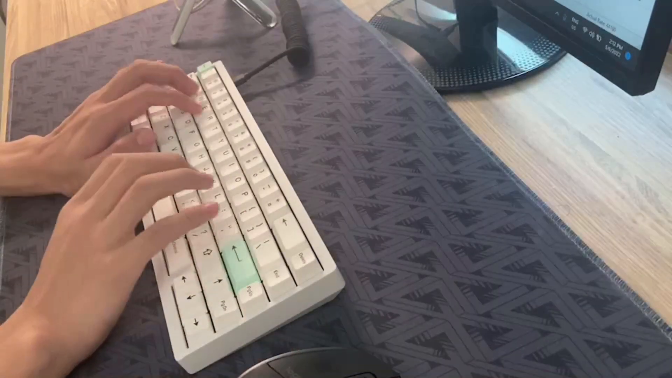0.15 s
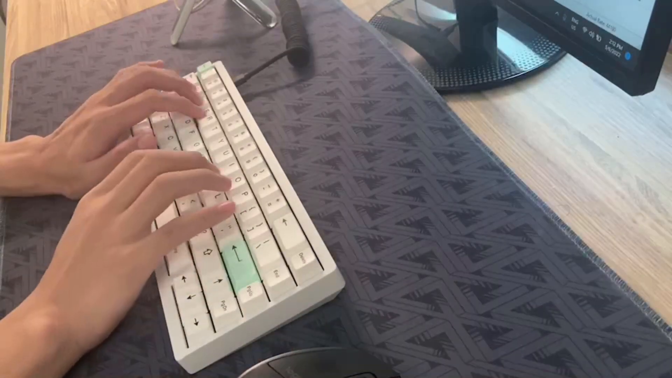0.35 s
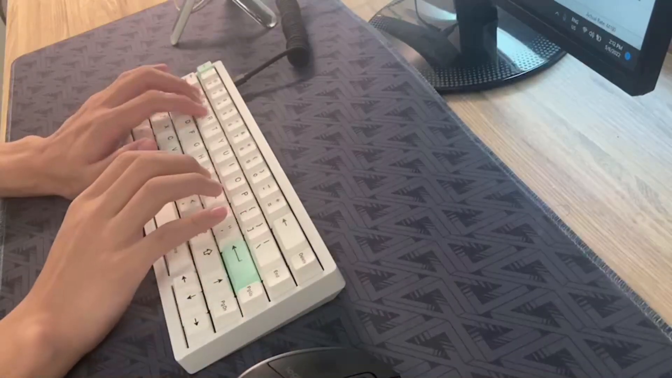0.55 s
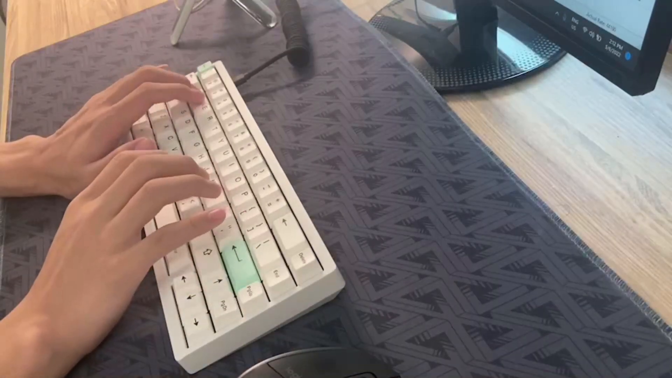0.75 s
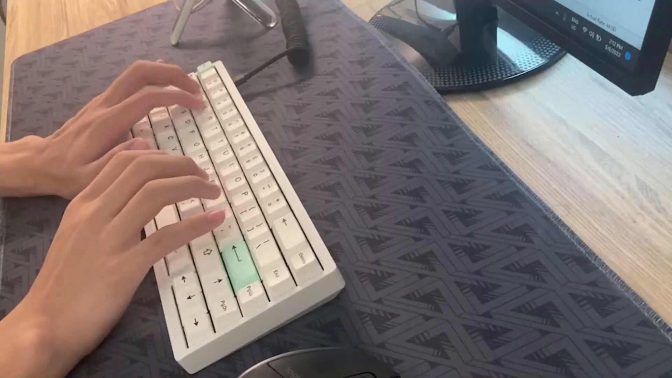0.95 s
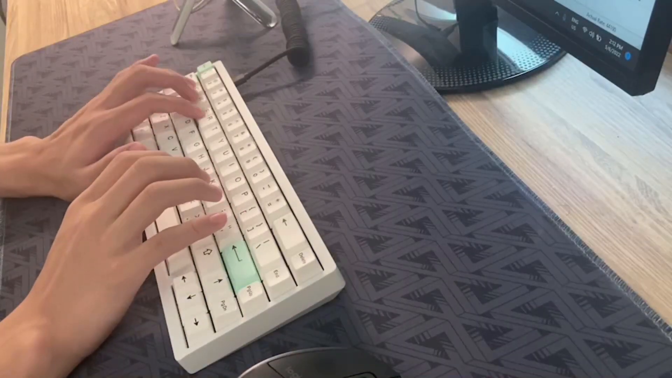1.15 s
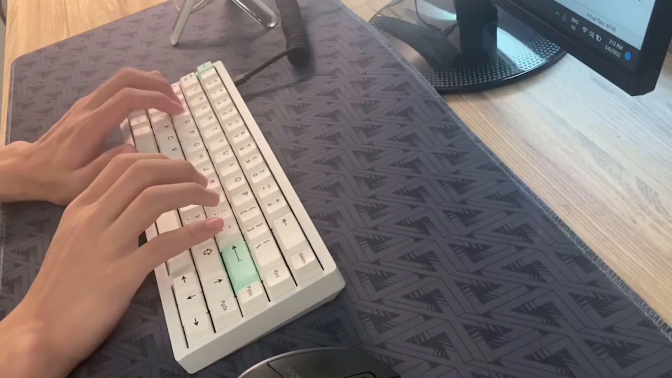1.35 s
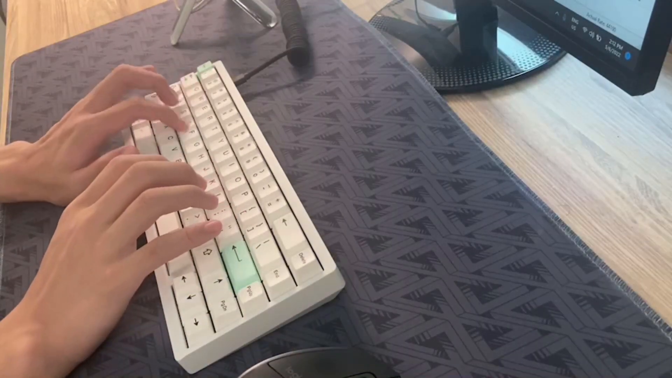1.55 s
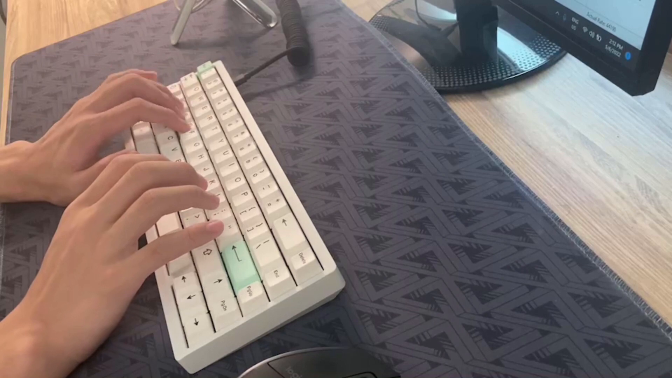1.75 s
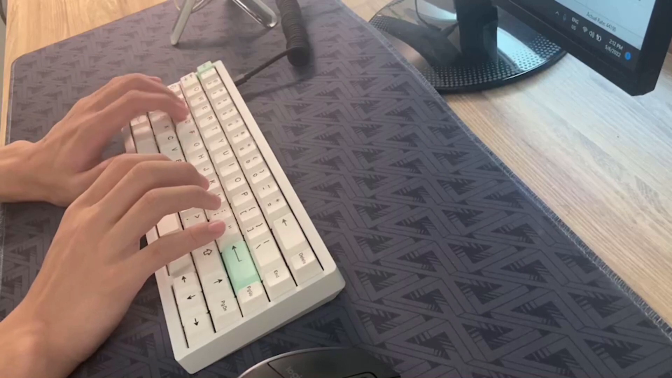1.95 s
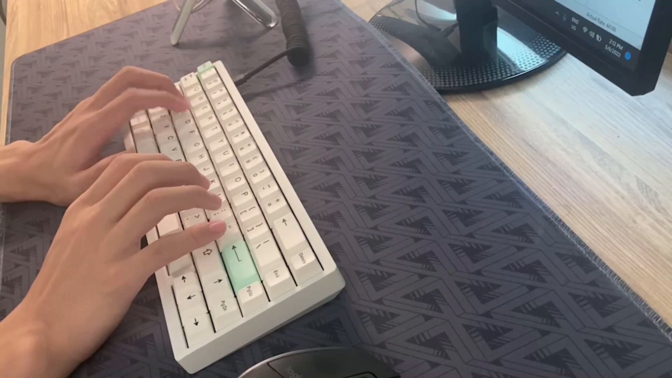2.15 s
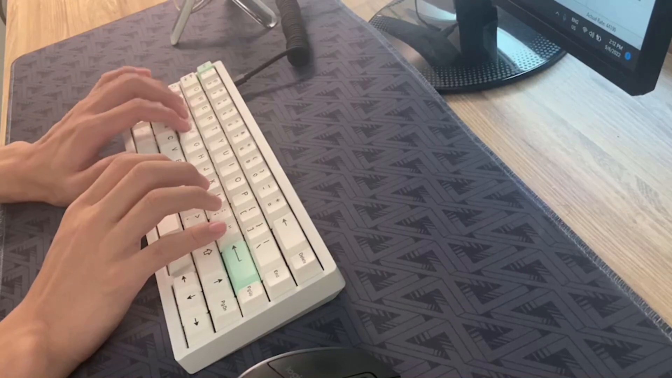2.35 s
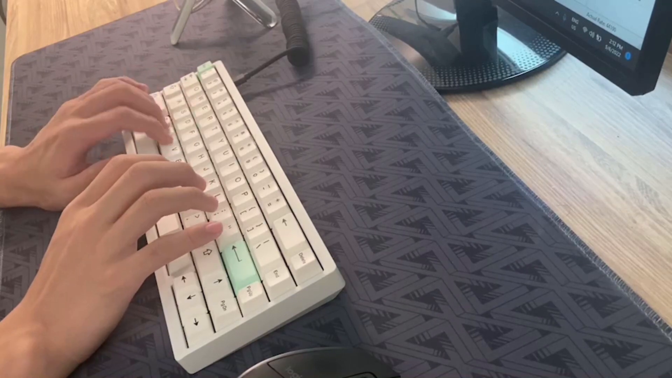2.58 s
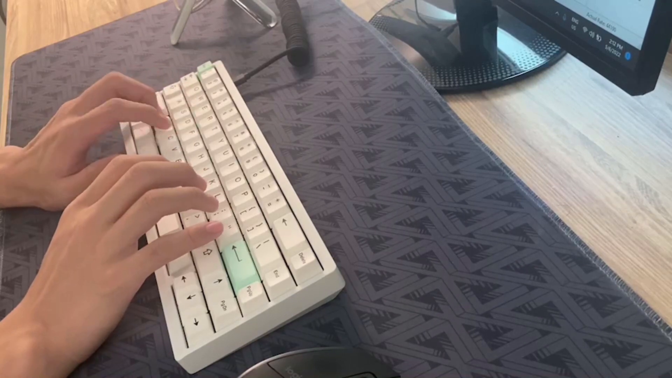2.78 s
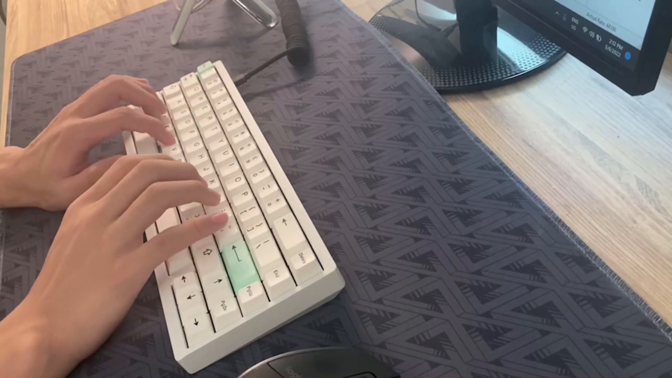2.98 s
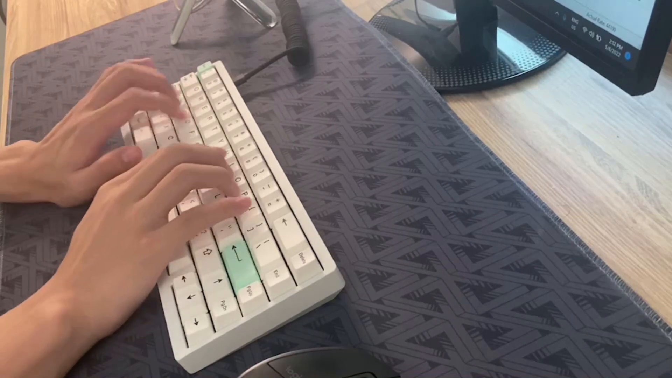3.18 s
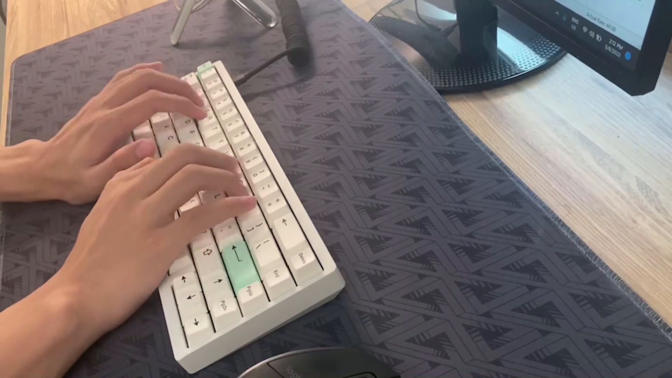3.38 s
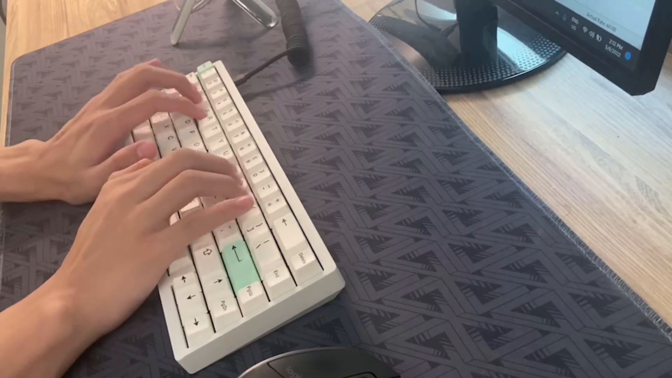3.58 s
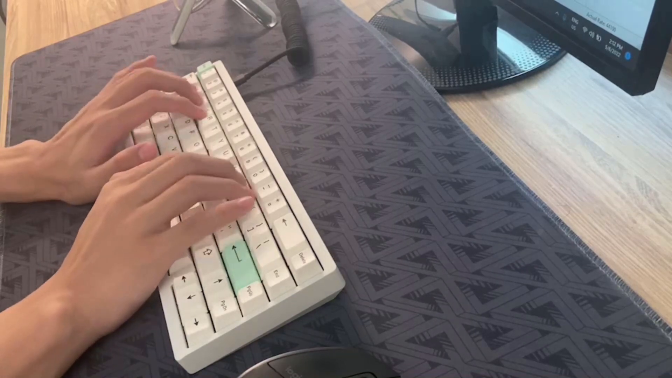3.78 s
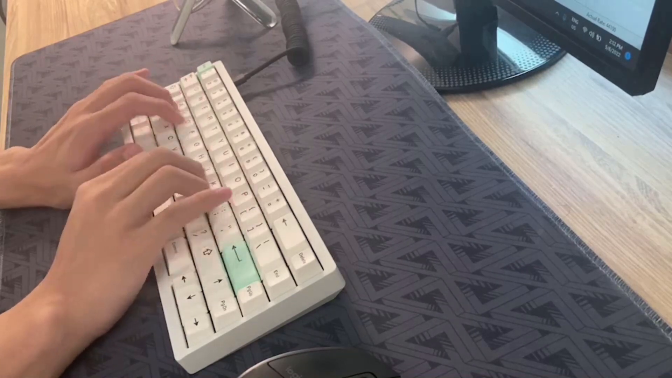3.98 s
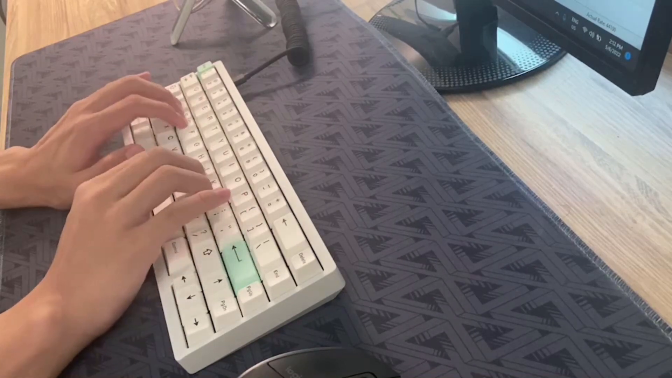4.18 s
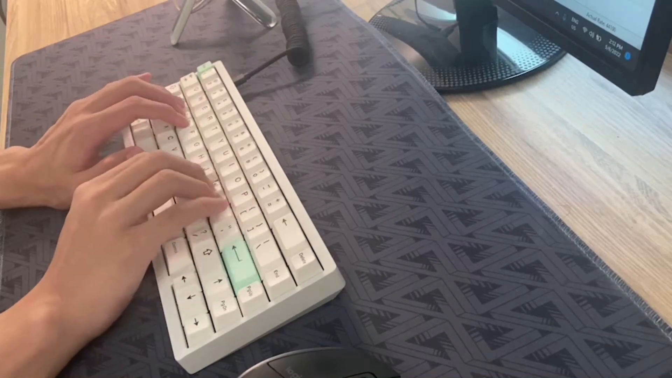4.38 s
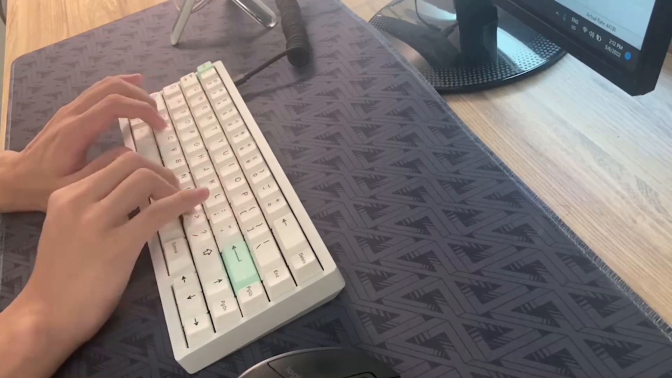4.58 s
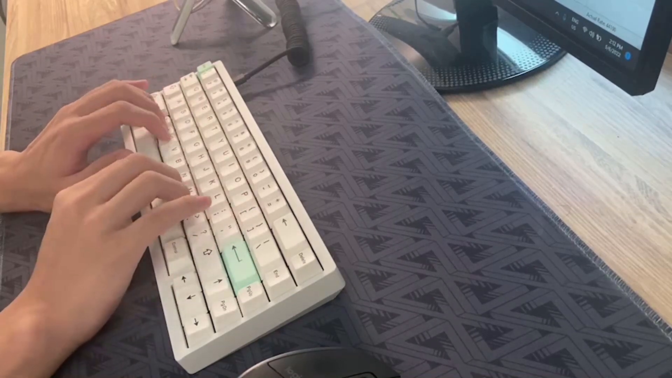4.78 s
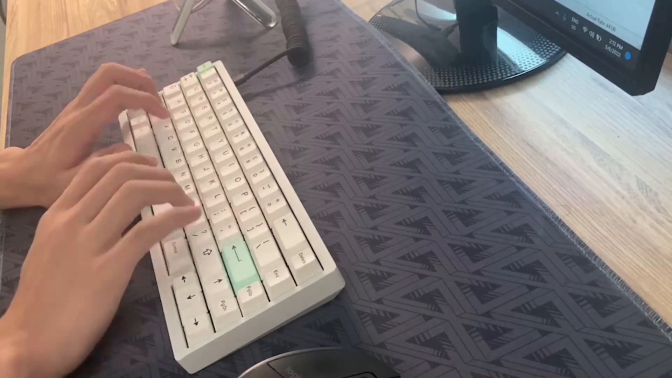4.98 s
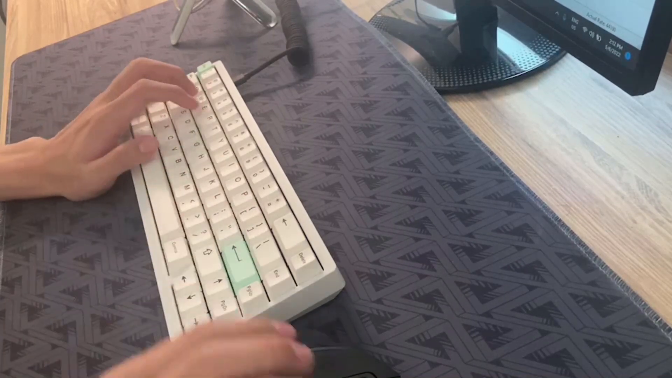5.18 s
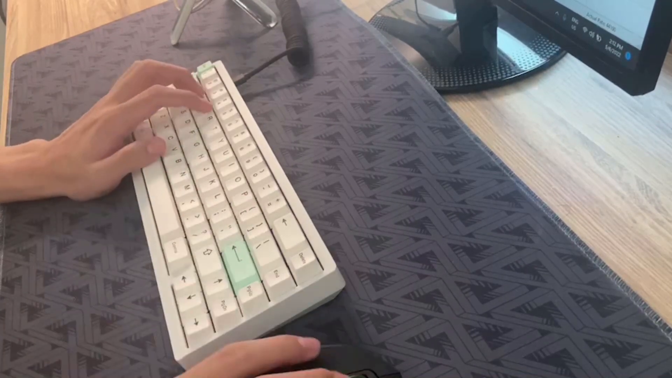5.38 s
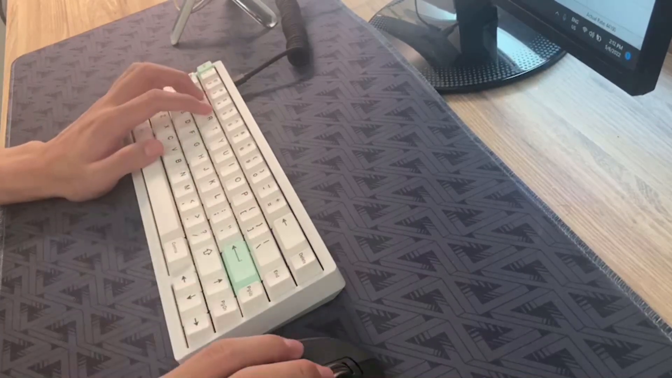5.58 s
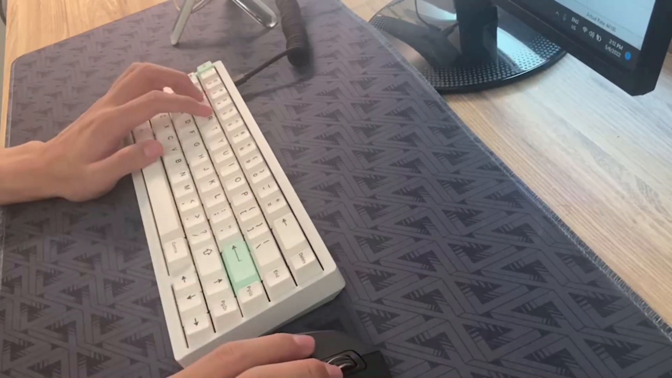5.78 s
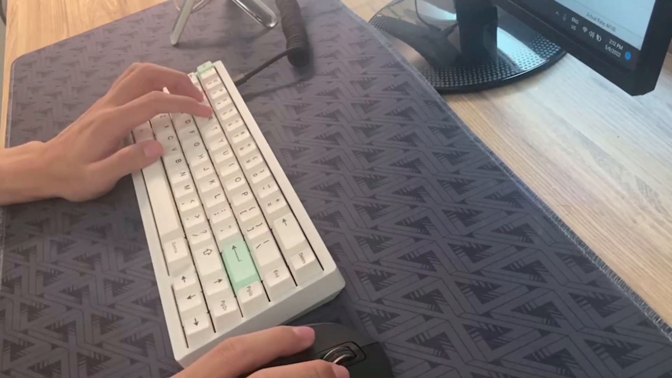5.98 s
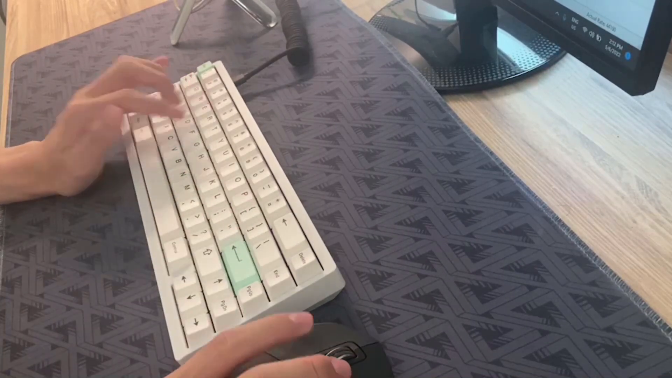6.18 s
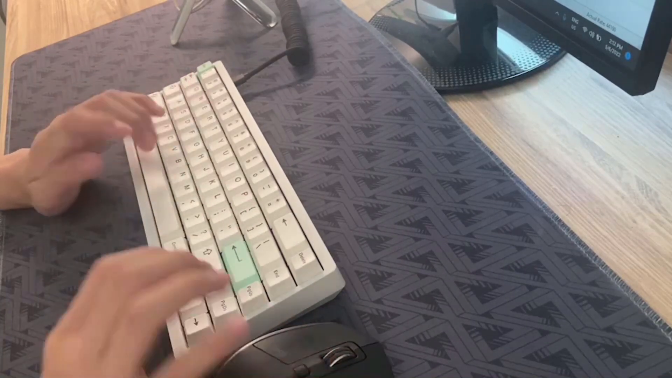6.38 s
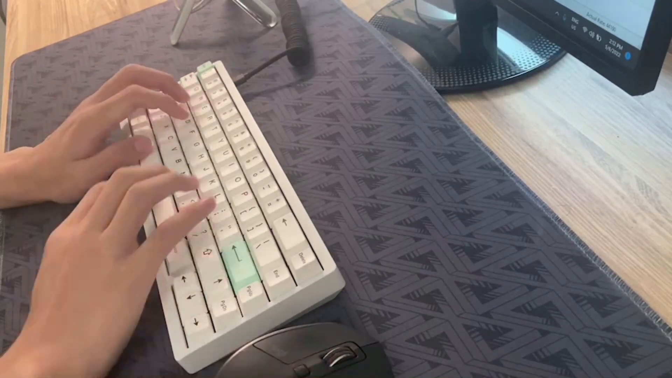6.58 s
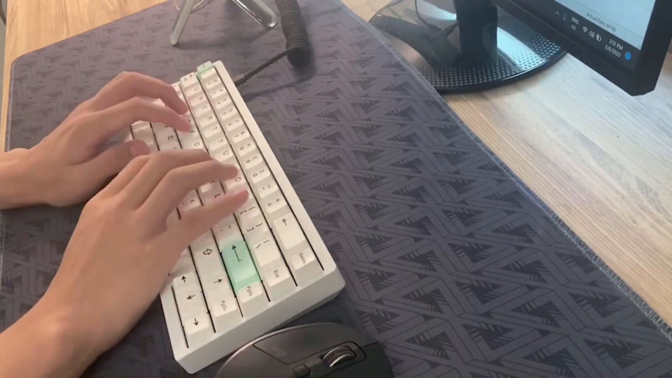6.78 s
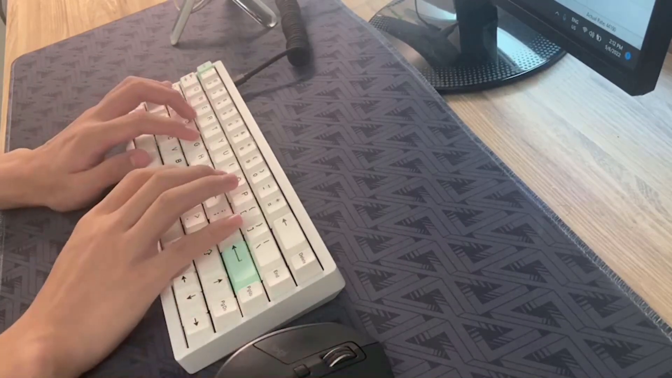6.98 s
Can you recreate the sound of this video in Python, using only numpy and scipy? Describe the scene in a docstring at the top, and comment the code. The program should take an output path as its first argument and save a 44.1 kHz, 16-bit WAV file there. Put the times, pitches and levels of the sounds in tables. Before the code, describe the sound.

Fast, clacky typing on a mechanical keyboard, then a short pause with a single mouse click and a hand brushing the desk mat.

```python
"""Fast typing on a small mechanical keyboard with soft linear switches, on a desk mat near the microphone.
Each key scrapes down and stops with a short plastic clack, a knock and a tick; the desk thumps and sways
under it and a small room rings after it. Then a hand brushes over to the mouse, clicks it once and
brushes back. Air noise and a low wavering hum lie behind it all, heard in mono from one fixed spot."""
import sys
import numpy as np
from scipy import signal
from scipy.fft import rfft, irfft
from scipy.io import wavfile

SR = 44100
rng = np.random.default_rng(int(sys.argv[2]) if len(sys.argv) > 2 else 0)


def file_out(sig):
    """Save sig as 16-bit WAV at sys.argv[1]."""
    # one column per channel
    cols = np.atleast_2d(sig).T
    # limit, then scale
    lim = np.clip(cols, -1, 1)
    pcm = np.round(lim * 32767).astype(np.int16)
    wavfile.write(sys.argv[1], SR, pcm)


N = 310905

# every stop of a key, down or up: (time [s], clack [dB], clack pitch [Hz], knock [dB], tick [dB])
KEY_STOPS = [(0.003, -25.5, 2130, -45, -40), (0.0425, -18.5, 2340, -23.5, -33.5),
             (0.0972, -29, 2630, -22, -25), (0.149, -34, 2600, -27.5, -36),
             (0.2445, -22.5, 2600, -25.5, -28.5), (0.272, -20.5, 2560, -25, -30.5),
             (0.325, -18.5, 2300, -26.5, -33), (0.3929, -14, 2920, -22, -28),
             (0.4457, -19.5, 2180, -23.5, -28), (0.527, -19, 2600, -23, -23.5),
             (0.5464, -22, 2320, -29, -28), (0.5923, -17, 2340, -24, -35),
             (0.6535, -16.5, 2540, -29, -24.5), (0.7054, -25, 2110, -24.5, -35),
             (0.7167, -18.5, 2180, -24, -31), (0.77, -18, 2480, -20, -21), (0.799, -21, 2360, -23.5, -31),
             (0.8523, -13.5, 2100, -25, -32), (0.918, -6.5, 2440, -15, -18.5),
             (0.9767, -26, 2440, -32, -37), (0.9942, -25, 2140, -23.5, -33),
             (1.0357, -5.5, 2400, -18, -13.5), (1.0716, -21, 2320, -29, -32),
             (1.111, -14.5, 2040, -30, -32), (1.1458, -10.5, 2630, -20, -25.5),
             (1.222, -18.5, 2170, -22.5, -24.5), (1.238, -19, 2120, -23, -26),
             (1.267, -15.5, 2470, -20, -20.5), (1.427, -15, 2170, -28.5, -21.5),
             (1.4718, -12, 2590, -29, -18.5), (1.5224, -9.5, 2820, -18, -16),
             (1.5761, -18, 2180, -27, -32.5), (1.602, -24, 2550, -27.5, -39),
             (1.6561, -11, 2770, -24, -21.5), (1.69, -17.5, 2360, -25, -29), (1.758, -11, 2630, -29, -20.5),
             (1.802, -11, 2500, -23.5, -18), (1.8725, -20, 2190, -26.5, -37), (1.893, -25, 2550, -29, -31),
             (1.9335, -12.5, 2870, -22.5, -22.5), (1.9653, -15, 2060, -24, -26),
             (2.025, -11.5, 2640, -36, -19), (2.077, -11.5, 2670, -17, -14.5),
             (2.134, -20.5, 1960, -29, -47), (2.1591, -15.5, 2780, -24, -31),
             (2.211, -18.5, 2680, -28, -23.5), (2.2316, -15.5, 2010, -24, -28.5),
             (2.3146, -14, 2700, -27, -23.5), (2.3608, -6.5, 3170, -29, -12), (2.3613, -5, 1950, -50, -13),
             (2.449, -17, 2300, -23, -33), (2.462, -12, 2550, -27, -30), (2.4798, -19, 2700, -27, -22.5),
             (2.6006, -6, 2370, -47, -19.5), (2.6883, -22, 2600, -20, -21.5),
             (2.7503, -11, 2370, -27.5, -33), (2.7775, -19.5, 2670, -24, -28), (2.834, -27, 2510, -24, -30),
             (2.8435, -16.5, 2340, -36, -31), (2.966, -19.5, 1910, -22.5, -31.5),
             (3.0548, -16, 2280, -29, -33), (3.0929, -23, 2200, -21, -28), (3.1252, -9, 2400, -27, -24),
             (3.1791, -13, 2430, -18, -20), (3.232, -16, 2260, -21.5, -27),
             (3.254, -29, 2140, -19.5, -20.5), (3.3877, -31.5, 2540, -39, -38),
             (3.423, -27, 2300, -31, -45), (3.4665, -20, 2530, -19.5, -30), (3.48, -14, 2520, -42, -24),
             (3.494, -23, 2200, -23, -50), (3.5025, -18, 2020, -20, -21), (3.562, -15.5, 2140, -26, -30),
             (3.574, -25, 2780, -27, -36), (3.581, -30, 2300, -20, -40), (3.5885, -20.5, 2600, -21, -20.5),
             (3.6453, -13, 2500, -23.5, -26), (3.6691, -30, 2430, -28, -33.5),
             (3.7141, -34, 2120, -24, -45), (3.7253, -14, 2190, -22, -32.5),
             (3.7577, -22, 2800, -22.5, -24), (3.786, -22, 2000, -24, -33),
             (3.8144, -11.5, 2540, -26, -28.5), (3.8558, -14.5, 2660, -18, -25),
             (3.943, -14.5, 2400, -19.5, -23.5), (3.9552, -49, 2450, -26.5, -37),
             (4.0644, -12.5, 2390, -26, -31), (4.0997, -21, 2740, -28.5, -32),
             (4.1693, -31.5, 2250, -32, -49), (4.2335, -17.5, 2470, -27.5, -35),
             (4.2373, -12.5, 2560, -26, -28), (4.2644, -26, 2980, -27, -39),
             (4.3003, -13, 2790, -23.5, -22.5), (4.3166, -23, 2250, -22.5, -42),
             (4.4054, -23, 2600, -26, -32), (4.4131, -17.5, 2390, -23.5, -33),
             (4.4171, -12, 2440, -34, -18.5), (4.4472, -21, 2820, -24, -32),
             (4.498, -14.5, 2520, -27, -17.5), (4.528, -26, 2570, -21, -33),
             (4.5478, -18, 2090, -25.5, -24), (4.5782, -25.5, 2970, -21, -29),
             (4.616, -19, 2530, -26.5, -26), (4.654, -28, 2770, -35, -41), (4.7015, -17.5, 2340, -25, -26),
             (4.7677, -27.5, 2240, -24.5, -38), (4.8032, -25.5, 1960, -32, -40),
             (4.816, -21, 2430, -25.5, -37), (4.8713, -15.5, 2280, -21.5, -27.5),
             (4.876, -35, 2270, -27, -30.5), (4.8986, -21, 2940, -23.5, -45),
             (4.934, -22.5, 2370, -24, -28), (5.0202, -23, 2150, -20.5, -19), (5.028, -42, 2180, -22, -34),
             (5.0361, -20, 2530, -18.5, -28), (5.0393, -11.5, 2450, -27, -27.5)]
# the keycap's hollow knock and its bright tick: (frequency [Hz], relative level [dB], t60 [s])
KNOCK_MODES = [(519, -16.5, 0.009), (860, -13.5, 0.01), (1287, 3, 0.006), (1610, 1.5, 0.0035)]
TICK_MODES = [(4630, 12, 0.0009), (6760, 9.5, 0.0014), (8450, 1.5, 0.0011), (11300, -3, 0.0012),
              (14700, -19.5, 0.00093)]
CHATTER_S, CHATTER_FALL_DB = 0.0022, 14  # the tick repeats within this time, fading


def key_stops(places):
    """Stem hits housing, close up: a clack that bounces once, a knock, and a tick that chatters."""
    bass_cut = signal.butter(2, 1100, "high", fs=SR, output="sos")
    stop_draws = rng.random((len(KEY_STOPS), 7))
    tick_draws = rng.random((len(KEY_STOPS), 4, len(TICK_MODES) + 2))  # four ticks a stop
    for (s, clack_db, hz, knock_db, tick_db), luck, ticks in zip(KEY_STOPS, stop_draws, tick_draws):
        place = places[int(len(places) * luck[6])]
        clack = gain_of(clack_db) * signal.sosfilt(bass_cut, ring(hz, t60=0.0017, rise=0.00051))
        # the more a key knocks and the less it clacks, the stronger its modes under 1 kHz
        deep_db = 0.63 * (knock_db - clack_db + 11)
        hollow = [(f, db + deep_db * (f < 1000), t60) for f, db, t60 in KNOCK_MODES]
        knock = gain_of(knock_db) * struck(hollow, luck[:4], rise=0.00024, spread=0.11, spread_db=-1)
        add(place, s, clack + knock)
        bounce = (0.33 + 0.24 * luck[5]) * clack
        add(place, s + 0.000906 + 0.001 * luck[4], bounce)
        for k, (late, soft, *draw) in enumerate(ticks):
            late = late * (k > 0)
            level = gain_of(tick_db - 2.5 - CHATTER_FALL_DB * late - 1.47 * soft)
            tick = struck(TICK_MODES, draw, rise=0.00036, spread=0.24, spread_db=7)
            add(place, s + CHATTER_S * late, level * tick)


# faint, light ticks of keys and mouse: (time [s], level [dB])
LIGHT_TICKS = [(0.088, -42), (0.463, -40), (0.908, -48), (0.643, -46), (2.195, -38), (2.354, -33),
               (2.584, -42), (2.6443, -33), (2.823, -52), (2.911, -44), (2.925, -40), (3.0705, -49),
               (4.016, -45), (4.09, -40), (4.111, -40), (3.862, -33), (4.392, -43), (4.442, -38),
               (4.463, -45), (4.682, -49), (4.856, -47), (5.7143, -55.5), (6.8614, -47.5)]


def light_ticks(places):
    """Keys and mouse tick faintly, each time in a scuff of three quick plastic ticks."""
    for k, (s, db) in enumerate(LIGHT_TICKS):
        for late, *draw in rng.random((3, len(TICK_MODES) + 1)):
            tick = struck(TICK_MODES, draw, rise=0.00019, spread=0.33)
            add(places[k % len(places)], s + CHATTER_S * late, gain_of(db) * tick)


# caps that ring on after the stop: (time [s], frequency [Hz], level [dB])
CAP_RINGS = [(0.098, 2800, -20), (2.362, 1500, -22), (2.362, 2060, -23), (2.362, 3200, -14),
             (4.0648, 3970, -27.5), (4.1003, 2620, -22), (4.417, 2200, -22), (4.417, 4080, -22),
             (4.498, 4900, -20.5), (4.616, 3000, -21.5)]


def cap_rings(places):
    """A cap rings in three close modes that die within about 20 cycles."""
    for k, (s, hz, db) in enumerate(CAP_RINGS):
        for detune in (-0.035, 0, 0.035):
            mode = ring(hz * (1 + detune), t60=20 / hz, rise=0.00026, size=1500)
            add(places[k % len(places)], s, gain_of(db) / 2 * mode)


def keyboard():
    """Keys and light ticks near the microphone, in nine places; small caps radiate little bass."""
    places = np.zeros((9, N))
    key_stops(places)
    light_ticks(places)
    cap_rings(places)
    return signal.sosfilt(signal.butter(3, 520, "high", fs=SR, output="sos"), places)


def stem_scrape():
    """Stems scrape in their housings on the way to each stop, and loose caps rattle now and then."""
    starts = np.zeros(N)
    for s, *_, tick_db in KEY_STOPS:
        add(starts, max(s - 0.025, 0), gain_of([0.14 * tick_db]))
    travel = signal.oaconvolve(starts, np.hanning(round(0.04 * SR)))[:N]
    jolts = (rng.random(N) < 60 / SR) * rng.exponential(1, N)  # about 60 a second
    rattle = signal.oaconvolve(jolts, gain_of(-0.33 * np.arange(200)))[:N]
    return gain_of(-70) * travel * (1 + 5 * rattle) * hiss([(2000, -10, 0)] + TICK_MODES)


# the firmest strokes pushing the desk top: (time [s], level [dB])
THUMPS = [(1.466, -41), (1.522, -42.5), (1.8, -42), (2.018, -42), (2.074, -42.5), (2.35, -40.5),
          (2.602, -39.5), (2.685, -40), (3.127, -38), (3.72, -43), (4.065, -41.5), (4.227, -41),
          (4.311, -39.5), (4.495, -42), (4.767, -44), (4.871, -35)]
# low modes of the desk top: (frequency [Hz], relative level [dB], t60 [s])
DESK_MODES = [(117.2, 1.5, 0.27), (136.6, -5.5, 0.43), (180, -2, 0.1)]
# the desk swaying on its legs: (middle [s], length [s], level [dB])
SWAYS = [(0.17, 0.26, -42), (0.75, 1, -48), (2.05, 0.95, -46), (2.7, 0.99, -41.5), (3.8, 0.61, -39),
         (4.7, 1, -49), (5.42, 0.42, -37)]
SWAY_HZ, REST_SWAY_DB = 23, -55  # it never stands quite still


def desk():
    """Under the keyboard: a slow, lumpy sway, dull thumps on firm strokes, a faint push at every stop."""
    swing_hz = SWAY_HZ + fuzzy_tone(0.88, 2.32)
    swing = np.sqrt(2) * np.sin(2 * np.pi * np.cumsum(swing_hz) / SR)
    out = swells(SWAYS) * (swing + 0.54 * fuzzy_tone(SWAY_HZ, 5.1))
    out += gain_of(REST_SWAY_DB) * fuzzy_tone(SWAY_HZ, 7.2)
    for (s, db), luck in zip(THUMPS, rng.random((len(THUMPS), len(DESK_MODES)))):
        thump = struck(DESK_MODES, luck, rise=0.0059, spread=0.1, spread_db=14, size=9000)
        add(out, s, gain_of(db + 1.5) * thump)
    for (s, clack_db, *_), (pitch, phase) in zip(KEY_STOPS, rng.random((len(KEY_STOPS), 2))):
        push = ring(70 * 5.01 ** pitch, t60=0.055, rise=0.0011, phase=phase, size=6000)
        add(out, s, gain_of(-39.5 + 0.2 * clack_db) * push)
    return out


# the mouse button's press and release: (time [s], level [dB])
CLICKS = [(6.1046, -30.5), (6.203, -27.5)]
# the mouse's thin shell: (frequency [Hz], relative level [dB], t60 [s])
SHELL_MODES = [(1700, -7.5, 0.0022), (4420, -8, 0.0037), (5390, 4, 0.0049), (6500, -1, 0.0027),
               (8740, -4, 0.0018), (10700, -4.5, 0.0019), (14200, -11, 0.0012)]


def mouse():
    """A hand's reach from the keys, the button's snap chatters unevenly for a few milliseconds."""
    out = np.zeros(N)
    for s, db in CLICKS:
        for k, (late, *draw) in enumerate(rng.random((9, len(SHELL_MODES) + 1))):
            delay = 0.00054 * (k + 1.9 * late * (k > 0))
            snap = struck(SHELL_MODES, draw, rise=0.0001, spread=0.055, spread_db=9)
            add(out, s + delay, gain_of(db - 2.1 * k) * snap)
    return out


# hand and sleeve sweeping the mat: (middle [s], length [s], level [dB])
SWEEPS = [(0.12, 0.49, -63.5), (5.24, 0.27, -66.5), (6.59, 0.54, -54), (6.95, 0.19, -72.5)]
# cloth on the mat: (frequency [Hz], relative density [dB])
CLOTH_SPECTRUM = [(600, -52), (1400, 3.5), (2700, -2.5), (5200, 1.5), (7500, -5), (10000, -14.5),
                  (13000, -18), (16000, -23)]
# the cuff during the longest sweep: (middle [s], length [s], level [dB], frequency [Hz], width [Hz])
CUFF_RUBS = [(6.527, 0.25, -59, 3190, 1600), (6.66, 0.26, -61.5, 1520, 500), (6.65, 0.43, -65, 5140, 1000)]


def sleeve():
    """Cloth brushes unevenly over the desk mat, and the cuff rubs grainily."""
    rub = np.zeros(N)
    for *swell, hz, width in CUFF_RUBS:
        grain = gain_of(2.7 * fuzzy_tone(63.6, 200))
        rub += swells([swell]) * grain * fuzzy_tone(hz, width)
    flutter = gain_of(1.6 * fuzzy_tone(39, 150))
    return rub + swells(SWEEPS, edge=0.98) * flutter * hiss(CLOTH_SPECTRUM)


# the small room's reverberation at the microphone: (frequency [Hz], t60 [s], level [dB])
ROOM_BANDS = [(500, 0.61, -7.5), (1360, 0.22, -7), (2610, 0.4, -9.5), (3250, 0.29, -2), (4350, 0.31, -11.5),
              (8600, 0.42, -13.5), (15900, 0.22, -7)]


def room(lanes):
    """Sparse reflections, other ones for each place on the desk; every band dies at its own speed."""
    gap = 12  # mean samples between reflections
    taps = np.zeros((len(lanes), 20000))
    arrivals = np.arange(60, 19980, gap) + rng.integers(0, gap, (len(lanes), 1660))
    np.put_along_axis(taps, arrivals, rng.choice([-1., 1.], arrivals.shape), 1)
    hz, t, bands = signal.stft(taps, SR, nperseg=128)
    t60 = read(ROOM_BANDS, hz)[:, None]
    near = 1 + 1.55 * np.exp(-t / 0.0095)  # the desk and screen answer first and loudest
    decay = gain_of(read(ROOM_BANDS, hz, column=2)[:, None] - 60 * t / t60)
    tail_energy = t60 * SR / gap / np.log(1e6)
    tails = signal.istft(bands * near * decay / np.sqrt(tail_energy), SR, nperseg=128)[1]
    return signal.oaconvolve(lanes, tails, axes=1)[:, :N].sum(0)


# the room's air noise: (frequency [Hz], relative density [dB])
AIR_SPECTRUM = [(30, 5), (48, 2), (70, -4.5), (150, -6), (300, -6.5), (480, -7), (800, -14), (1500, -17),
                (2200, -24), (4000, -31.5), (7000, -45), (16000, -53)]
# low hum near the desk's pitch, and two faint higher tones: (frequency [Hz], width [Hz], level [dB])
HUM_TONES = [(115.4, 7.5, -61.5), (263.6, 14, -63), (309.4, 13.6, -62)]
AIR_DB = -49


def room_tone():
    """Steady air noise all around the microphone, with a low wavering hum and two faint higher tones."""
    air = gain_of(AIR_DB) * hiss(AIR_SPECTRUM)
    return air + sum(gain_of(db) * fuzzy_tone(hz, width) for hz, width, db in HUM_TONES)


def gain_of(db):
    return 10 ** (np.asarray(db) / 20)


def unit_rms(x):
    return x / np.sqrt(np.mean(x ** 2) + 1e-20)


def read(points, hz, column=1):
    """One column of a spectrum table, on a log-frequency axis."""
    table = np.array(points)
    return np.interp(np.log(hz + 1), np.log(table[:, 0] + 1), table[:, column])


def add(mix, s, sound):
    part = mix[round(s * SR):][:len(sound)]
    part += sound[:len(part)]


def ring(hz, t60, rise, phase=0, size=600):
    """A damped vibration that swells for a moment first; t60 and rise in seconds, phase in cycles."""
    t = np.arange(size) / SR
    shape = (1 - np.exp(-t / rise)) ** 2 * gain_of(-60 * t / t60)
    return shape / shape.max() * np.sin(2 * np.pi * (hz * t + phase))


def struck(modes, luck, rise, spread, spread_db=0, size=600):
    """Short modes, set a little off in pitch, phase and level by luck (a 0-1 draw each); peak 1."""
    luck = np.asarray(luck)
    detunes = 1 + spread * (luck - 0.5)
    gains = gain_of(spread_db * (np.roll(luck, 1) - 0.5))
    blow = sum(gain * gain_of(db) * ring(hz * detune, t60, rise, phase, size)
               for (hz, db, t60), detune, phase, gain in zip(modes, detunes, luck[::-1], gains))
    return blow / abs(blow).max()


def hiss(points):
    """Steady noise of a given spectrum, rms 1."""
    shape = gain_of(read(points, np.fft.rfftfreq(N, 1 / SR)))
    return unit_rms(irfft(rfft(rng.standard_normal(N)) * shape, N))


def fuzzy_tone(hz, width):
    """Noise in a band around hz: a tone that wavers, rms 1."""
    pole = [1, -np.exp(-np.pi * width / SR)]
    slow = signal.lfilter([1], pole, signal.lfilter([1], pole, rng.standard_normal((2, N))))
    carrier = np.exp(2j * np.pi * hz * np.arange(N) / SR)
    return unit_rms(((slow[0] + 1j * slow[1]) * carrier).real)


def swells(rows, edge=2):
    """A gain that rises and falls once for every row; an edge under 2 gives a broad top, quick ends."""
    t = np.arange(N) / SR
    gain = np.zeros(N)
    for middle, length, db in rows:
        arch = np.cos(np.pi * np.clip((t - middle) / length, -0.5, 0.5))
        gain += gain_of(db) * arch ** edge * (abs(t - middle) < length / 2)
    return gain


def scene():
    """All that reaches the microphone; the mouse carries more room than the keys and sounds farther."""
    places, clicks = keyboard(), mouse()
    reflections = gain_of(4.5) * room(clicks[None]) + room(places)
    typing = places.sum(0) + stem_scrape() + desk()
    return (typing + clicks + reflections + room_tone() + sleeve())[None]


def record(dry):
    """The microphone's channel cuts off steeply at 16.3 kHz."""
    low_pass = signal.firwin(511, 16300, window=("kaiser", 9), fs=SR)
    return signal.oaconvolve(dry, low_pass[None], "same")


dry = scene()
out = record(dry)
file_out(out)
```